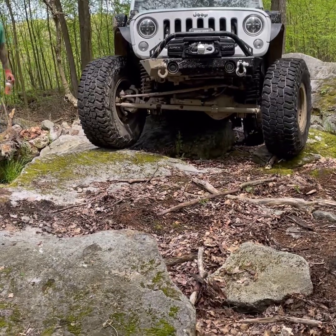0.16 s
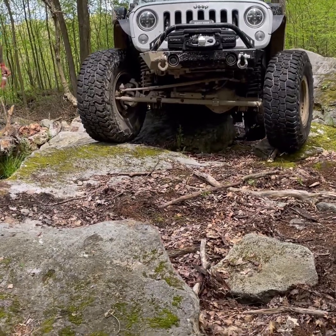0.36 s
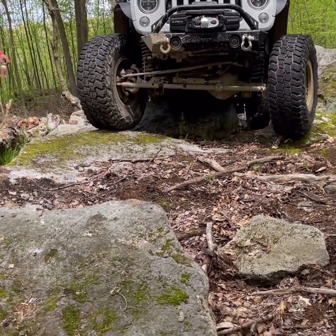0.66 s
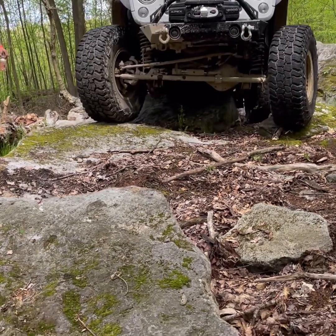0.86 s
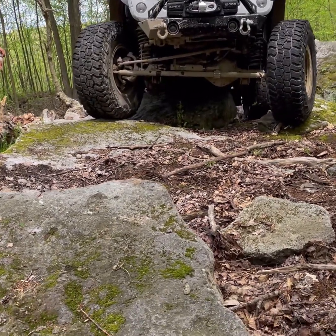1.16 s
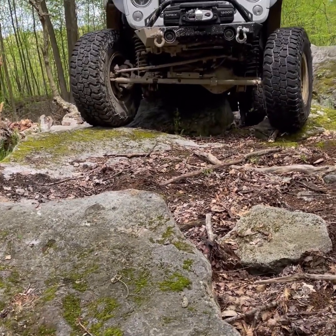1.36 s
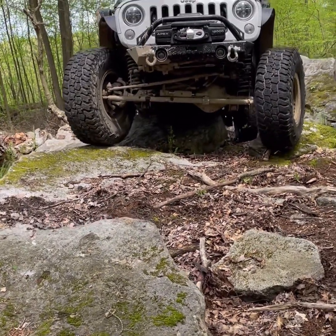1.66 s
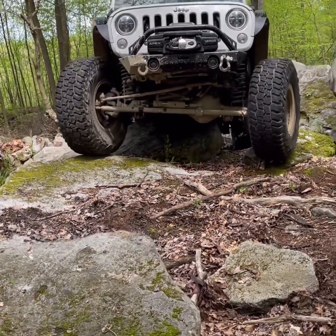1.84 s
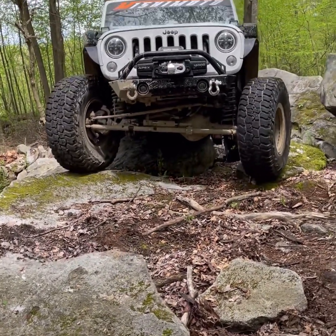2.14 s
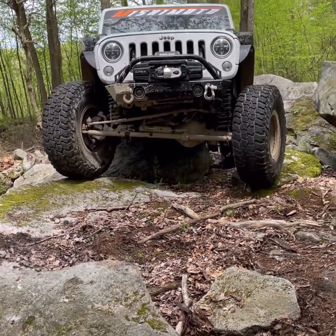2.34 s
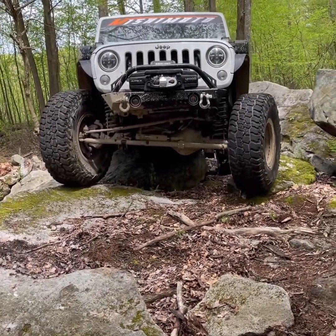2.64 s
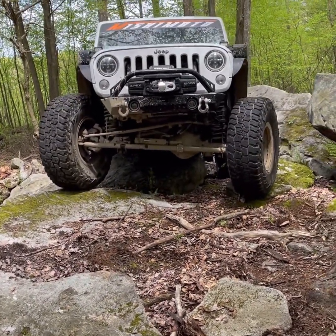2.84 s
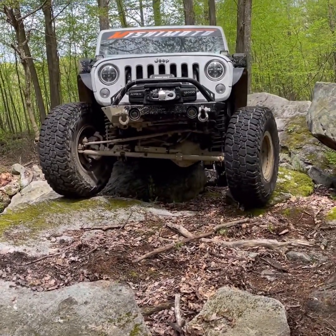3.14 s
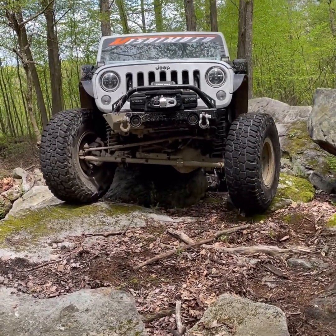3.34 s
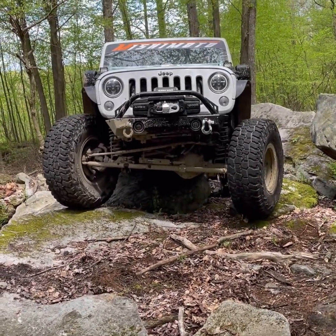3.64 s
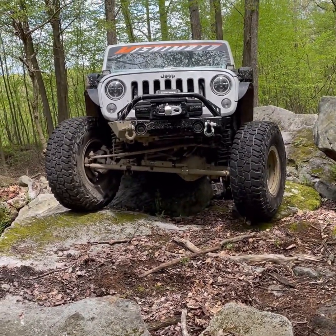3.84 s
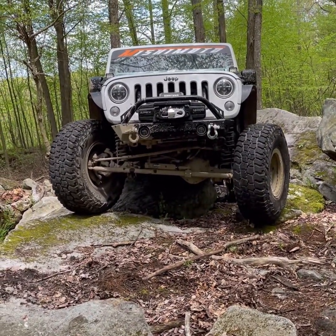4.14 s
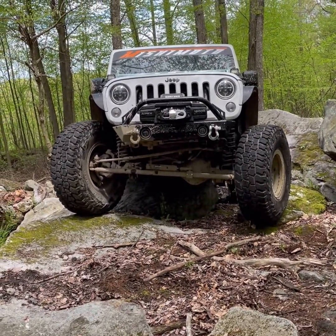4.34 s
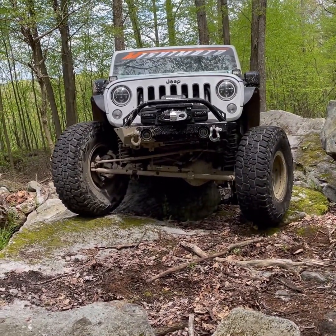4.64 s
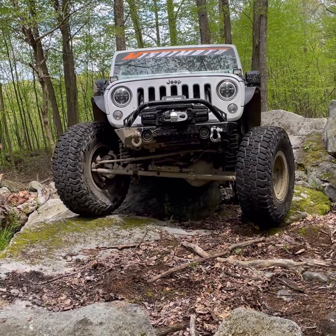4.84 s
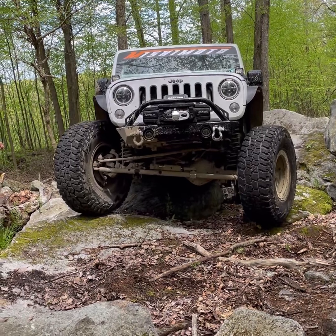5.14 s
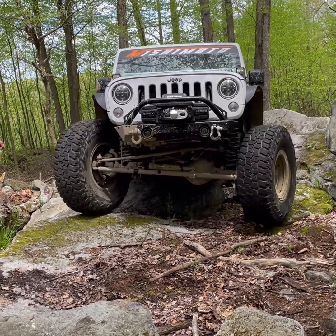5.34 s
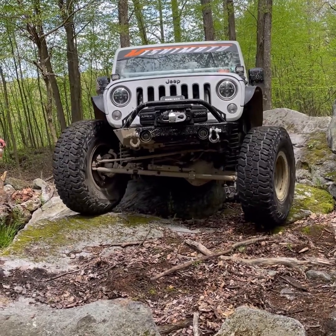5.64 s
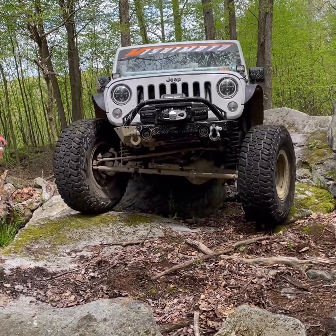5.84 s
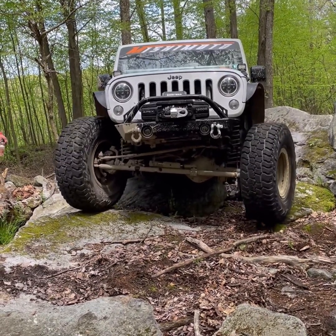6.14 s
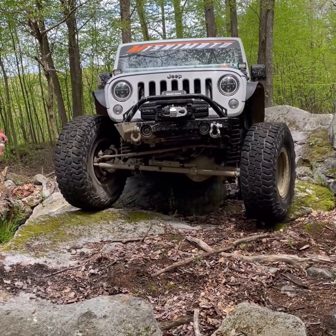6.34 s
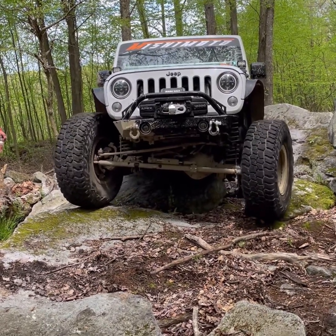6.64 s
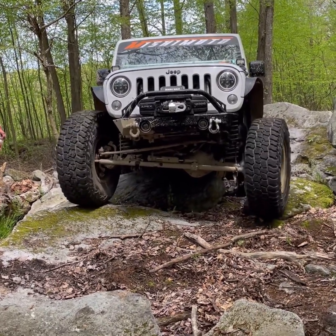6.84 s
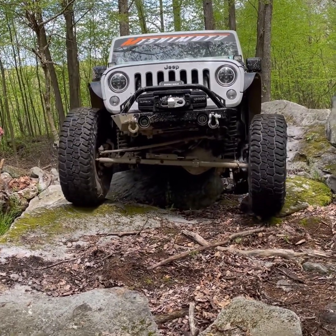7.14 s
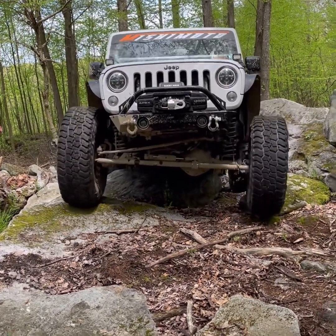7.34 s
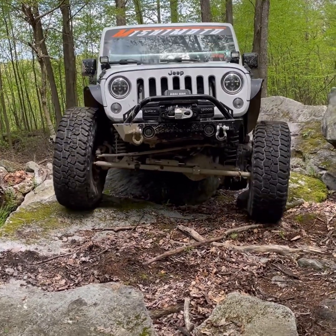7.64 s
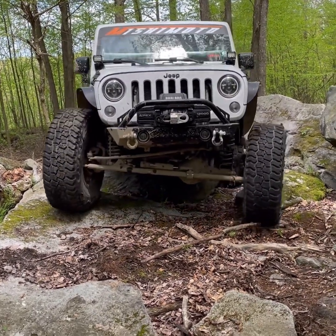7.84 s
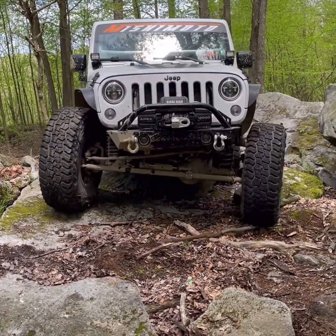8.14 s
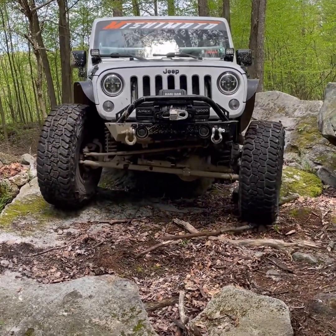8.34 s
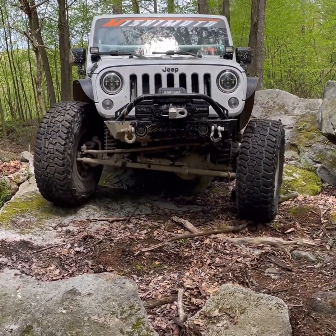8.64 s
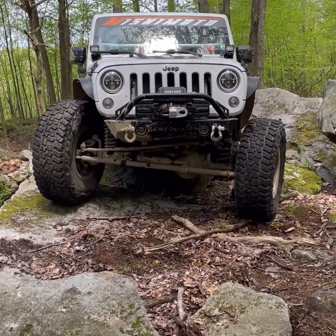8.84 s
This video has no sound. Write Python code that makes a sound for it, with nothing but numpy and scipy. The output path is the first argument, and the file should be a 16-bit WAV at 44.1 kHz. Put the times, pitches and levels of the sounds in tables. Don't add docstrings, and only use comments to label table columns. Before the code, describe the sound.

Outdoors in a rocky wood, heard close from the front, a big engine idles low under fan hum and valve clatter. Steel booms and grinds on stone at once, then again longer with a squeal. The engine surges, the suspension thuds, tyre lugs slip and crack on rock, and finally the engine pushes harder as metal scrapes once more and twigs and leaves crackle.

```python
import sys
import numpy as np
from scipy import signal
from scipy.fft import rfft, irfft, next_fast_len
from scipy.io import wavfile
from scipy.ndimage import uniform_filter1d

SR = 44100
rng = np.random.default_rng(int(sys.argv[2]) if len(sys.argv) > 2 else 0)


def to_linear_factor(level_db):
    exponent = np.asarray(level_db, float) / 20
    return 10 ** exponent


def put_to_file(sound):
    columns = np.atleast_2d(sound).T
    safe = np.clip(columns, -1, 1)
    whole_steps = np.round(safe * 32767)
    wavfile.write(sys.argv[1], SR, whole_steps.astype(np.int16))


N = 396018

# (time [s], hold [s], level [dB], fall per 20 dB [s])
PLATE_DRAGS = [(0, .01, -36, 0.04), (.1, 0.055, -26, 0.0675), (.17, 0.1226, -29, 0.0431),
               (1.52, 0.024, -29, 0.41), (1.64, 0.071, -25.5, 0.15), (1.83, 0.025, -26.5, 0.2283),
               (1.9, 0.069, -29.5, 0.128), (5.31, 0.12, -32, 0.3), (6.75, .15, -39, .2),
               (7.0, .1, -33, .15), (7.5, .06, -33, .15), (7.68, 0.153, -31, 0.42),
               (7.85, 0.11, -27.5, 0.1)]
DRAG_RISE_S = 0.064


def rms_one(x):
    return x / np.sqrt(np.mean(x ** 2) + 1e-20)


def in_time(rows, fade=.02):
    s, *columns = np.transpose(rows)
    t = np.arange(N) / SR
    gate = np.interp(t, [s[0] - fade, s[0], s[-1], s[-1] + fade], [0, 1, 1, 0])
    return [np.interp(t, s, c) for c in columns] + [gate]


def at_hz(points, hz):
    f, value = np.transpose(points)
    return np.interp(np.log(hz + 1), np.log(f + 1), value)


def strokes(rows, rise_s, fall_s=None, floor_db=-120):
    s, hold, db, *own = np.transpose(rows)[:, :, None]
    t = np.arange(0, N + 32, 32) / SR
    fall_s = own[0] if fall_s is None else fall_s
    below = (s - t).clip(0) / rise_s + (t - s - hold).clip(0) / fall_s
    return np.interp(np.arange(N) / SR, t, np.max(db - 20 * below, axis=0).clip(floor_db))


def drift(rate):
    r = np.exp(-80 * np.pi * rate / SR)
    slow = signal.lfilter([1], [1, -2 * r, r * r], rng.standard_normal(N // 40 + 2002))[2000:]
    return np.interp(np.arange(N) / 40, np.arange(len(slow)), rms_one(slow - slow.mean()))


def band(x, low_hz, high_hz):
    return signal.sosfilt(signal.butter(2, [low_hz, high_hz], "band", fs=SR, output="sos"), x)


def resonate(x, modes):
    out = 0
    for k, (hz, width, level_db) in enumerate(modes):
        r = np.exp(-np.pi * width / SR)
        a = [1, -2 * r * np.cos(2 * np.pi * hz / SR), r * r]
        b = np.array([1, 0, -1]) * (1 - r * r) / 2
        out = out + (-1) ** k * to_linear_factor(level_db) * signal.lfilter(b, a, x)
    return out


def grains(per_s, spread_db):
    sizes = to_linear_factor(spread_db * np.minimum(rng.exponential(1, N), 4)) * rng.choice([-1, 1], N)
    return rms_one(sizes * (rng.random(N) < per_s / SR) + 1e-18)


def evened(x, over_s):
    return x / np.sqrt(uniform_filter1d(x ** 2, round(over_s * SR)).clip(0) + 0.054 * np.mean(x ** 2))


def knocks(events, cycles, noisy, rise_s, reach):
    out, t = np.zeros(N + SR), np.arange(SR // 5) / SR
    noise = rng.standard_normal((len(events), len(t)))
    for (s, peak_db, hz), puff in zip(events, noise):
        shape = (1 - np.exp(-t / rise_s)) * np.exp(-t * hz / cycles)
        puff = rms_one(band(puff, 0.5 * hz, reach * hz))
        blow = shape / shape.max() * ((1 - noisy) * np.sin(2 * np.pi * hz * t) + noisy * puff)
        at = round(s * SR)
        out[at:at + len(t)] += to_linear_factor(peak_db) * blow
    return out[:N]


def engine():
    # (time [s], firing rate [Hz])
    engine_speed = [(0, 39.84), (2.0, 40.94), (2.2, 49.85), (2.45, 52.25), (3.5, 39.8), (4.25, 39.94),
                    (4.75, 43.31), (5.1, 40.73), (5.5, 40.29), (5.7, 47.38), (5.85, 48.4), (6.6, 39.79),
                    (7.1, 39.05), (7.45, 55.47), (7.6, 57.52), (7.9, 56.34), (8.5, 61.21), (8.98, 56.4)]
    # (time [s], hold [s], level [dB], fall per 20 dB [s])
    throttle_pushes = [(2.19, 0.305, -21.5, 0.89), (3.0, 0.2435, -32, 0.48), (3.72, 0.195, -35.5, 1),
                       (4.7, 0.819, -42, .3), (5.715, 0.1106, -20, 0.9), (6.98, 0.0402, -36, 1.24),
                       (7.26, 0.064, -20, 3), (7.38, 0.068, -17, 0.4), (7.55, 0.948, -25.5, 2.5)]
    # (time [s], hold [s], level [dB])
    uneven_spells = [(3.24, .04, -36), (3.44, 0.13, -41), (3.7, 0.09, -33), (3.9, .6, -41), (4.6, .12, -37),
                     (4.83, .05, -26), (4.86, .65, -28.5)]
    # (time [s], level [dB])
    exhaust_flow = [(0, -45.5), (.9, -33.5), (1.25, -56.5), (2.0, -49), (2.15, -38), (2.6, -44.5),
                    (3.5, -37.5), (3.75, -42.5), (4.75, -46.5), (5.1, -37.5), (6.5, -35), (6.75, -50),
                    (7.26, -31), (7.45, -33.5), (7.9, -40), (8.0, -43.5), (8.2, -36), (8.55, -32.5),
                    (8.98, -41.5)]
    # (order [-], resonance [Hz], width [Hz], level [dB])
    pipe_orders = [(2, 119.3, 23.6, 2), (3, 124.64, 18.7, 1.5), (4, 234.7, 25.8, -9), (5, 247.7, 21.5, -6),
                   (6, 255.5, 49, -14.5)]
    rate_hz, _ = in_time(engine_speed)
    drive_db, _ = in_time(exhaust_flow)
    first_db = strokes(throttle_pushes, 0.168, floor_db=-53)
    odd_db = strokes(uneven_spells, 0.14, 0.137, floor_db=-55)
    phase = 2 * np.pi * np.cumsum(rate_hz * (1 + 0.0029 * drift(4.4))) / SR
    out = to_linear_factor(first_db) * np.sin(phase - np.pi / 12)
    out += to_linear_factor(odd_db) * np.sin(3 * phase / 2)
    drive = to_linear_factor(drive_db + 0.75 * drift(11.8))
    for order, pipe_hz, width_hz, db in pipe_orders:
        near = 1 / (1 + ((round(order) * rate_hz - pipe_hz) / width_hz) ** 2)
        out += to_linear_factor(db) * drive * near * np.sin(round(order) * phase)
    return np.sqrt(2) * out, phase


def fan_hum():
    # (time [s], level [dB])
    fan_level = [(0, -43), (.3, -40.5), (.77, -50.5), (1.3, -54), (1.75, -41.5), (4.3, -41), (4.78, -43),
                 (5.33, -39), (6.53, -43.5), (7.7, -38.5), (8.98, -40.5)]
    # (frequency [Hz], level [dB])
    fan_lines = [(201.7, 0), (403.4, -8.5), (807, -18)]
    level_db, _ = in_time(fan_level)
    turn = 2 * np.pi * np.cumsum(1 + 0.001656 * drift(3.19)) / SR
    out = np.zeros(N)
    for hz, db in fan_lines:
        out += np.sqrt(2) * to_linear_factor(level_db + db + 0.814 * drift(4.86)) * np.sin(hz * turn)
    return out


def engine_bay(phase):
    # (time [s], level [dB])
    bay_level = [(0, -42), (2.0, -40.5), (3.9, -42), (4.3, -40), (5.1, -41.5), (6.0, -40.5), (6.95, -38.5),
                 (7.1, -37), (7.85, -37.5), (8.1, -40.5), (8.98, -38)]
    # (frequency [Hz], density [dB per Hz])
    bay_colour = [(150, -2), (240, -10.5), (320, -4), (430, -3.5), (650, -11), (950, -8), (1500, -15),
                  (3000, -21), (6000, -29.5), (8000, -24.5), (11000, -44.5), (13500, -35), (15500, -40.5)]
    level_db, _ = in_time(bay_level)
    air = rng.standard_normal((2, N)) + 0.22 * grains(900, 6.3)
    edges = 130 * 2 ** np.arange(0, 7.1, .5)
    patches = [to_linear_factor(1.136 * drift(7.1)) for _ in range(4)]
    out = 0
    for k, (low, high) in enumerate(zip(edges, edges[1:])):
        colour = to_linear_factor(at_hz(bay_colour, np.sqrt(low * high)))
        out = out + colour * patches[k % 4] * band(air[k % 2], low, high)
    out = out / np.std(band(out, 374.4, 7000))
    out = out * (1 + 0.08 * np.sin(phase)) * to_linear_factor(0.75 * drift(19.8))
    shake_db = strokes(PLATE_DRAGS, DRAG_RISE_S) - 12
    return np.hypot(to_linear_factor(level_db), to_linear_factor(shake_db)) * out


def skid_plate():
    # (frequency [Hz], width [Hz], level [dB])
    boom_modes = [(220.3, 34.4, -3.5), (253, 39.7, 0.0), (273.9, 26.6, -4.0), (434, 18.3, -14.5)]
    # (frequency [Hz], width [Hz], level [dB])
    ring_modes = [(1661, 45, -3), (2005, 11.3, 2.5), (2140, 9.8, -0.5), (2650, 56, 0), (2867, 8, 8.5),
                  (2980, 21, 7), (3518, 18.6, -5), (4328, 36, -4.5), (4994, 45, -11)]
    # (time [s], hold [s], level [dB], fall per 20 dB [s], share that rings the plate [0-1])
    plate_grinds = [(0, 0.0326, -46, 0.33, .15), (.1, 0.2, -43.5, 0.05, 0.2),
                    (0.127, 0.019, -41.5, 0.05, 0.1), (6.63, .12, -53, 0.2, 0.06),
                    (1.45, 0.072, -46, 0.36, 0.34), (1.521, 0.14, -41, 0.22, 0.36),
                    (1.628, 0.0186, -36.5, 0.2132, 0.32), (1.735, 0.0153, -34, 0.09, 0.15),
                    (1.78, 0.03, -42, 0.15, 0.1), (1.85, .04, -51, .3, .12),
                    (5.31, 0.06, -47.5, 0.54, 0.07), (7.723, 0.1, -47, 0.3741, 0.06),
                    (7.962, 0.00973, -50.5, 0.64, 0.19)]
    # (time [s], peak level [dB], pitch [Hz])
    plate_jolts = [(0.071, -29, 237), (0.102, -24, 234), (0.136, -25, 250), (0.165, -20, 242),
                   (0.215, -20, 237), (0.259, -20, 245), (0.284, -28, 261), (1.517, -22, 253),
                   (1.617, -22, 226), (1.651, -20, 261), (1.681, -20, 253), (1.724, -20, 223),
                   (1.783, -25, 296), (1.813, -23, 242), (1.839, -19, 250), (1.874, -22, 250),
                   (1.904, -21, 213), (1.945, -20, 256)]
    boom = resonate(resonate(grains(200, 3.37), boom_modes), [(250.4, 290, 0)])
    boom = rms_one(evened(boom, 0.0414))
    grit = grains(4000, 4.55) * to_linear_factor(1.0 * drift(23))
    ring = rms_one(sum(resonate(grit, [mode]) * to_linear_factor(1.97 * drift(9.5)) for mode in ring_modes))
    minor_hz = np.linspace(1450, 6200, 24) + rng.uniform(-92, 90, size=24)
    minor = resonate(grit, [(hz, 45, 0) for hz in minor_hz])
    hiss = 0.493 * rms_one(band(minor, 1200, 3950))
    hiss += 0.547 * rms_one(band(grit, 390, 3510))
    hiss += 0.383 * rms_one(band(grit, 2870, 8350))
    scale = np.std(band(ring + hiss, 3904, 4930))
    out = to_linear_factor(strokes(PLATE_DRAGS, DRAG_RISE_S) - 4.5) * boom
    out += to_linear_factor(-1.5) * knocks(plate_jolts, cycles=4.5, noisy=0.1, rise_s=0.004, reach=1.6)
    s, hold, db, fall, share = np.transpose(plate_grinds)
    share = np.clip(share, .01, 1)
    for part, weight in ((ring, 1.81 * share), (hiss, 1.213 * (1 - 0.89 * share))):
        rows = np.transpose([s, hold, db + 20 * np.log10(weight), fall])
        out += to_linear_factor(strokes(rows, 0.076) - 0.5) * part / scale
    return out


def rumble():
    # (time [s], hold [s], level [dB])
    axle_heaves = [(.27, .02, -37.5), (.3, 7.1, -43.5), (6.95, .05, -33.5), (8.1, .9, -49),
                   (.94, .02, -34.5), (1.12, 0.103, -37), (1.85, 0.11, -38), (2.17, 0.198, -33.5),
                   (2.47, 0.042, -29), (3.3, 0.054, -32.5), (3.62, 0.21, -36.5), (3.92, 0.0304, -31.5),
                   (4.2, 0.368, -36), (4.77, 0.032, -29.5), (5.45, 0.114, -34.5), (5.72, 0.0397, -33.5),
                   (5.94, 0.0176, -28), (6.12, 0.081, -36), (6.65, .25, -35), (7.28, 0.177, -33.5),
                   (7.82, 0.15, -34)]
    level_db = strokes(axle_heaves, .15, 0.26, floor_db=-58)
    lumps = band(grains(90, 2.77) + .5 * rng.standard_normal(N), 49.5, 120.3)
    return to_linear_factor(level_db + 0.5) * rms_one(evened(lumps, 0.22))


def creak():
    # (time [s], hold [s], level [dB], pitch [Hz])
    steel_creaks = [(.04, 0.042, -45.5, 2492), (.065, 0.0153, -44, 1696), (.122, 0.0143, -43.5, 1457),
                    (.128, 0.0174, -35.5, 2822), (.115, .045, -49.5, 5980), (.16, 0.0215, -36, 2664),
                    (.215, 0.0305, -43, 2980), (.225, 0.0245, -42.5, 2672), (.215, .02, -45, 3604),
                    (.275, .035, -44, 3630), (.11, .04, -50, 3480), (.13, .03, -44, 2980),
                    (.165, .03, -46, 2200), (.1, .05, -45, 1820), (.27, .03, -45, 2800),
                    (.235, 0.019, -45.5, 1699), (.85, 0.049, -42.5, 661), (1.435, 0.032, -45, 2506),
                    (1.43, .01, -46, 3500), (1.435, .12, -45.5, 4965), (1.57, .05, -47, 4990),
                    (1.46, .07, -50, 3480), (1.49, 0.0146, -41, 2600), (1.53, 0.047, -46.5, 2980),
                    (1.535, .085, -44, 3466), (1.55, .04, -47, 1990), (1.61, 0.0214, -36, 2637),
                    (1.625, .06, -35, 3476), (1.625, .05, -40, 5007), (1.655, 0.0194, -37.5, 2750),
                    (1.705, 0.041, -38, 1228), (1.725, 0.029, -36, 2660), (1.78, 0.019, -36, 530),
                    (1.79, 0.0214, -36.5, 693), (1.86, 0.112, -47, 740), (1.845, 0.039, -44.5, 2980),
                    (1.95, 0.0147, -48.5, 2980), (2.012, .012, -47, 1830), (3.68, 0.035, -43.5, 667.8),
                    (7.715, 0.0196, -43, 1517), (7.76, .015, -42, 1524), (7.8, .035, -38.5, 1513),
                    (7.78, 0.045, -46, 1950), (7.86, 0.07, -41.5, 1410), (7.93, 0.034, -39, 1385),
                    (7.78, 0.11, -39.5, 1010), (7.705, .03, -42, 1030), (5.3, .13, -40.5, 436),
                    (5.36, .1, -33.5, 215), (7.955, 0.0122, -46, 3007)]
    rise_s, fall_s = .028, .025
    out, t = np.zeros(N), np.arange(N) / SR
    wavers = [drift(43.9) for _ in range(2)]
    for k, (s, hold, db, hz) in enumerate(steel_creaks):
        on = slice(max(int((s - .2) * SR), 0), int((s + hold + .2) * SR))
        below = (s - t[on]).clip(0) / rise_s + (t[on] - s - hold).clip(0) / fall_s
        level = to_linear_factor(db - 1.8 - 20 * below + 3.0 * wavers[k % 2][on])
        out[on] += np.sqrt(2) * level * np.sin(2 * np.pi * hz * t[on] + 1.6 * wavers[1 - k % 2][on])
    return out


def suspension_thuds():
    # (time [s], peak level [dB], pitch [Hz])
    thud_blows = [(0.464, -27.5, 124), (0.929, -26, 77), (1.089, -24.5, 128.5), (1.18, -20, 150),
                  (1.233, -21, 140), (1.365, -27, 122), (2.457, -21, 105), (2.51, -19, 55),
                  (2.58, -27, 100), (3.385, -30, 60), (3.95, -27, 60), (7.9, -19, 150), (3.29, -23.5, 78.1),
                  (3.614, -23.5, 83.1), (3.684, -19, 89.7), (3.789, -23.5, 71.47), (3.905, -30, 99),
                  (4.218, -16.5, 85), (4.272, -16, 90), (4.38, -17.5, 74), (4.366, -25, 170),
                  (4.455, -20, 150), (4.555, -23, 90), (4.592, -20, 85), (4.78, -17, 80), (4.827, -20, 70),
                  (5.327, -20, 138), (5.923, -21, 88.1), (6.126, -21, 72.6), (6.287, -19.5, 110.7),
                  (7.074, -23, 127), (7.237, -21.5, 129.5)]
    return to_linear_factor(0.13) * knocks(thud_blows, cycles=1.546, noisy=0.27, rise_s=0.007, reach=3.2)


def grit_ticks():
    # (time [s], peak level [dB], pitch [Hz])
    stone_ticks = [(1.1031, -30.5, 1020), (2.0111, -32.5, 1850), (2.2533, -29.5, 1030), (3.3662, -32, 1290),
                   (3.6745, -29, 1020), (4.072, -31.5, 1038), (4.262, -29, 1300), (4.3294, -32.5, 1240),
                   (4.5675, -28, 900), (0.855, -31.5, 1100), (3.235, -32.5, 900), (3.29, -30.5, 900),
                   (6.725, -29.5, 2000), (4.455, -39.5, 1000), (0.9, -37.5, 1500), (8.2, -36, 4900),
                   (7.228, -36, 2600), (7.275, -37, 3400)]
    return to_linear_factor(-5.0) * knocks(stone_ticks, cycles=21.4, noisy=0.544, rise_s=0.00069, reach=3.18)


def squeals():
    # (time [s], pitch [Hz], level [dB])
    squeal_tracks = [
        [(1.69, 3039, -23), (1.712, 2990, -27), (1.723, 2990, -20.5), (1.742, 2975, -19), (1.778, 2940, -24),
         (1.795, 2900, -51.5)],
        [(7.94, 3541, -53.5), (7.958, 3490, -28.5), (7.968, 3510, -34), (7.98, 3565, -47)],
    ]
    # (multiple of pitch [-], level [dB])
    squeal_partials = [(.94, -13.5), (1, -1), (2, -15), (3, -17.5)]
    out = np.zeros(N)
    for rows in squeal_tracks:
        pitch_hz, level_db, gate = in_time(rows, fade=0.0092)
        phase = 2 * np.pi * np.cumsum(pitch_hz * (1 + 0.00441 * drift(84.2))) / SR
        level_db = level_db + 1.65 * drift(55)
        below_top = np.minimum(level_db - np.max(rows, axis=0)[2], 0)
        tone = sum(to_linear_factor(db + 2.0 * (k - 1) * below_top) * np.sin(k * phase) for k, db in squeal_partials)
        out += np.sqrt(2) * gate * to_linear_factor(level_db) * tone
    return out


def tyre_lugs():
    # (time [s], hold [s], level [dB])
    lug_slips = [(5.24, 0.0097, -40), (5.28, 0.051, -32), (5.45, 0.056, -39.5), (5.55, 0.07, -33.5),
                 (5.885, 0.158, -40), (5.96, .01, -36), (6.075, 0.0325, -27.5), (6.255, 0.038, -28.5),
                 (6.415, .03, -38), (6.465, 0.0445, -29), (6.625, 0.0695, -33.5), (6.735, 0.0104, -36.5),
                 (6.885, 0.035, -30), (7.11, 0.0153, -35.5), (7.27, 0.016, -34), (7.435, 0.05, -27.5),
                 (7.57, 0.034, -35.5), (7.79, .04, -38), (7.85, 0.048, -45.5), (7.94, .01, -38)]
    # (time [s], hold [s], level [dB])
    tread_creep = [(5.194, 2.8, -51.5)]
    # (frequency [Hz], width [Hz], level [dB])
    carcass_modes = [(224.6, 99.3, -1.5), (434.4, 178.4, -2.5), (952, 78, 1), (1530, 312, -9.5),
                     (2290, 625, -17), (4000, 2500, -28.5)]
    level_db = strokes([*lug_slips, *tread_creep], 0.053, 0.0696)
    slips = band(grains(1800, 2.6) * to_linear_factor(2.5 * drift(61)), 142, 4500)
    carcass = evened(resonate(slips, carcass_modes), 0.0365)
    return to_linear_factor(level_db) * carcass / np.std(band(carcass, 382, 2500))


def lug_cracks():
    # (time [s], peak level [dB], pitch [Hz])
    lug_snaps = [(5.24, -26.5, 940), (5.263, -25, 915), (5.284, -19, 1400), (5.522, -24, 936),
                 (5.598, -24, 968), (5.887, -22, 915), (5.958, -20.5, 951.5), (6.012, -25, 1050),
                 (6.067, -18.5, 1341), (6.073, -23.5, 1291), (6.086, -16, 933), (6.103, -14.5, 957),
                 (6.121, -24.5, 937), (6.237, -20.5, 947), (6.256, -18.5, 904), (6.277, -17, 994),
                 (6.293, -21.5, 933), (6.38, -27, 897.2), (6.41, -24.5, 943), (6.462, -20.5, 904),
                 (6.487, -19.5, 937.2), (6.504, -18.5, 960.4), (6.61, -21.5, 965), (6.644, -22, 867),
                 (6.689, -25, 934), (6.732, -25, 955.6), (6.832, -23, 943), (6.873, -22.5, 974),
                 (6.89, -17.5, 899), (7.107, -26, 904), (7.232, -24, 890), (7.274, -23, 977),
                 (7.442, -20, 1041), (7.467, -17, 1047), (7.566, -27.5, 984),
                 (5.304, -28, 910), (5.321, -27, 961), (5.376, -31, 1240), (5.534, -27, 961),
                (5.554, -23, 953), (5.57, -24, 939), (5.584, -27, 1040), (5.611, -29, 999),
                (6.131, -27, 985), (6.307, -27, 907), (6.474, -22, 961), (6.529, -28, 972),
                (6.664, -26, 950), (6.699, -31, 937), (7.261, -25, 993), (7.405, -27, 888),
                (7.427, -23, 853), (7.454, -19, 1030), (7.478, -25, 1350), (7.487, -26, 1000)]
    return to_linear_factor(-5) * knocks(lug_snaps, cycles=6.5, noisy=0.25, rise_s=0.00072, reach=1.64)


def leaves():
    # (time [s], hold [s], level [dB])
    leaf_crushes = [(5.28, 0.17, -57), (6.49, .02, -61), (6.66, 0.257, -62.5), (7.16, 0.097, -50),
                    (7.33, 0.027, -52), (7.5, 0.112, -50.5), (7.72, 0.058, -53.5), (8.05, 0.817, -60)]
    level_db = strokes(leaf_crushes, 0.124, 0.2)
    crackle = band(grains(6000, 2.36), 1970, 12800)
    return to_linear_factor(level_db + 2.53 * drift(17)) * crackle / np.std(band(crackle, 6000, 16700))


def twig_snaps():
    # (time [s], peak level [dB], pitch [Hz])
    twig_breaks = [(5.2835, -24, 1700), (7.3417, -19, 1825), (8.0556, -19, 1866), (8.057, -25, 1400),
                   (8.3355, -23, 1367)]
    splinters = [(s, db, 3200) for s, db, _ in twig_breaks]
    out = to_linear_factor(-5.5) * knocks(twig_breaks, cycles=16.6, noisy=0.6, rise_s=0.0007, reach=2.1)
    out += to_linear_factor(-11) * knocks(splinters, cycles=27, noisy=0.97, rise_s=0.0006, reach=1.5)
    return out


def ports(x, air):
    # (frequency [Hz], phase by which left leads [rad])
    port_phase = [(0, 0), (1900, -.1), (2410, .7), (3190, .2), (4400, .8), (4780, 0), (5550, .05),
                  (6900, 2.8), (8500, 3.5), (9800, 5.6), (10500, 6.2), (11700, 6.4), (13200, 9.2),
                  (14800, 9.6), (15500, 10.55)]
    # (frequency [Hz], left minus right [dB])
    port_balance = [(200, 0), (380, 1.0), (700, 4.0), (1290, 3.2), (1900, 0.3), (2600, -1.5), (4300, -1.5),
                    (4800, 0)]
    # (frequency [Hz], unshared part [dB])
    port_diffuse = [(60, -22), (150, -17), (400, -19), (1000, -10), (1950, -18), (2500, -12), (3400, -17),
                    (4300, -13), (4800, -18.5), (5500, -18.5), (6300, -12), (9300, -13), (10300, -19),
                    (11700, -19), (13200, -10)]
    size = next_fast_len(N)
    hz = np.arange(size // 2 + 1) * SR / size
    half = to_linear_factor(at_hz(port_balance, hz) / 2) * np.exp(.5j * at_hz(port_phase, hz))
    shared = rfft(x, size) * np.array([half, 1 / half])
    own = rfft(air, size) * to_linear_factor(at_hz(port_diffuse, hz)) * np.array([[1], [-1]])
    return irfft(shared + own, size)[:, :N]


def scene():
    exhaust, phase = engine()
    bay = engine_bay(phase)
    contact = skid_plate() + creak() + grit_ticks() + squeals()
    contact += to_linear_factor(-1.0) * tyre_lugs() + leaves() + twig_snaps()
    dull = band(contact, 218, 3430)
    echoes = to_linear_factor(-15.5) * np.roll(dull, round(.013 * SR))
    echoes += to_linear_factor(-20) * np.roll(dull, round(.037 * SR))
    rough = rumble() + contact + suspension_thuds() + lug_cracks()
    unshared = np.roll(bay, SR // 8) + np.roll(rough, round(.011 * SR))
    return ports(exhaust + fan_hum() + bay + rough + echoes, unshared)


def low_pass(x):
    return signal.sosfilt(signal.butter(12, 15800, fs=SR, output="sos"), x)


def record(dry):
    mix = signal.sosfilt(signal.butter(2, 28, "high", fs=SR, output="sos"), dry)
    return low_pass(mix)


dry = scene()
out = record(dry)
put_to_file(out)
```